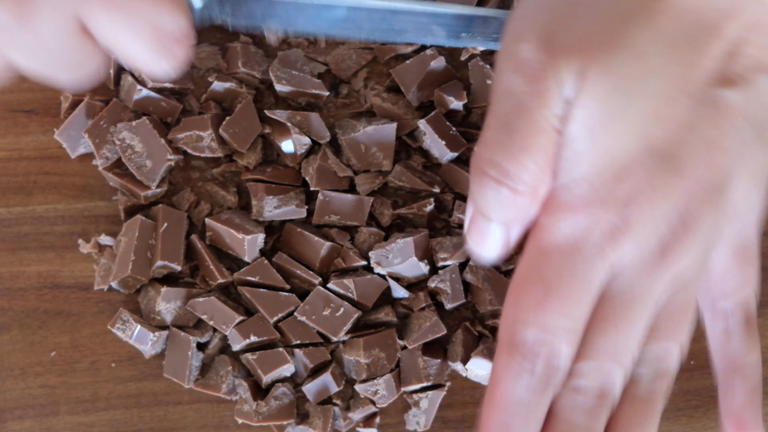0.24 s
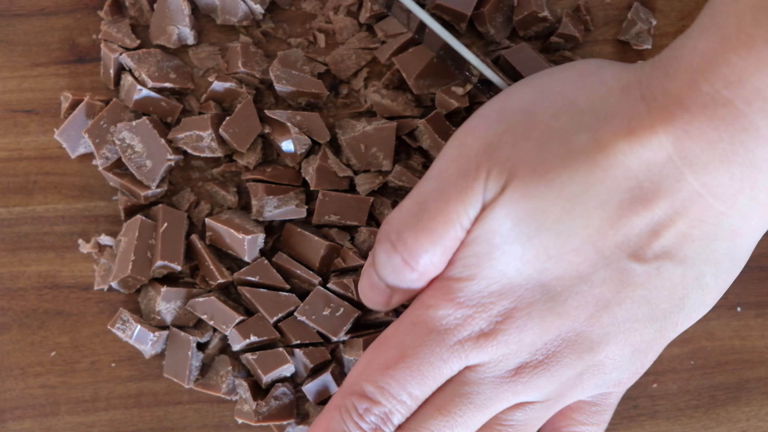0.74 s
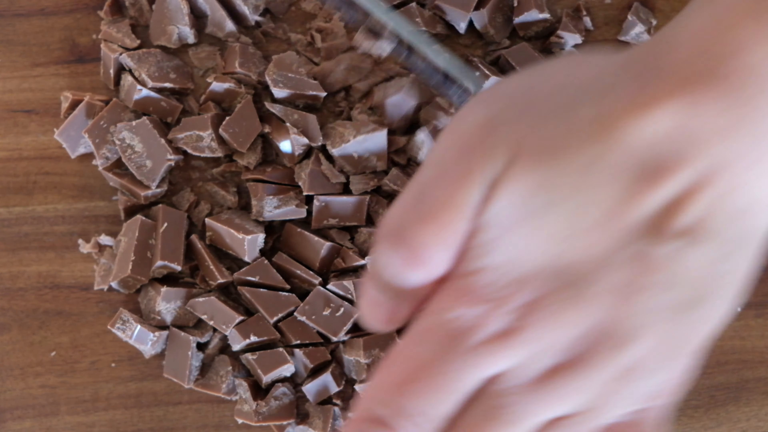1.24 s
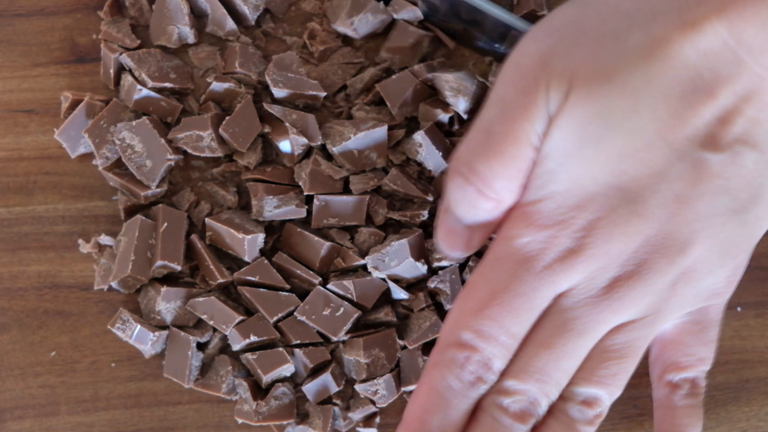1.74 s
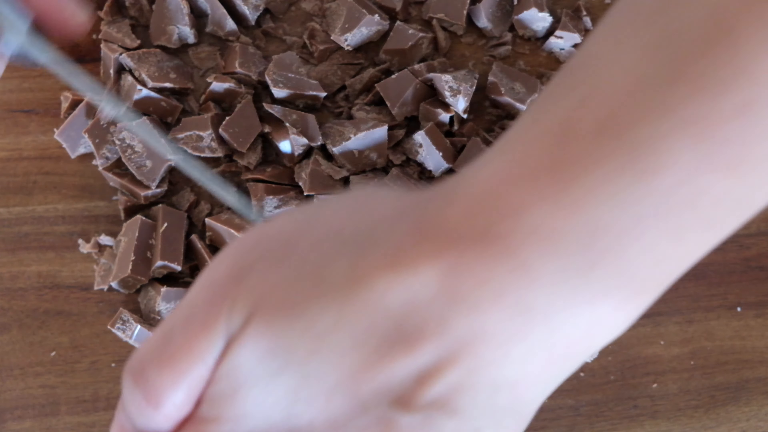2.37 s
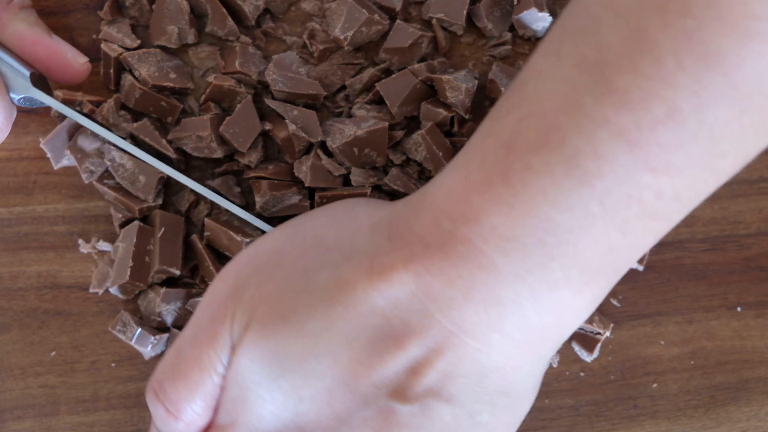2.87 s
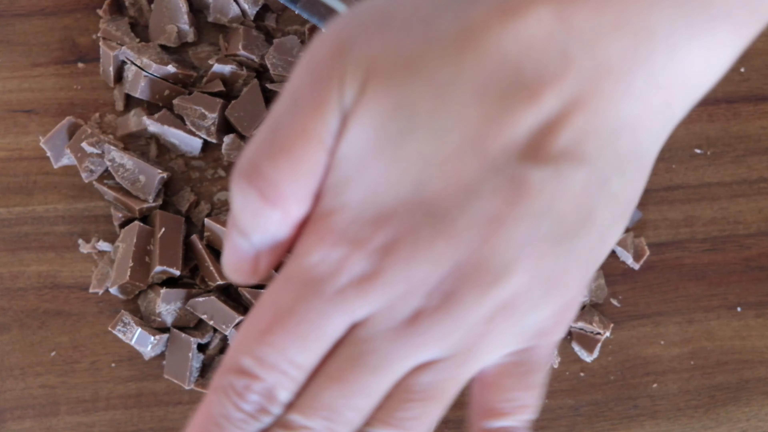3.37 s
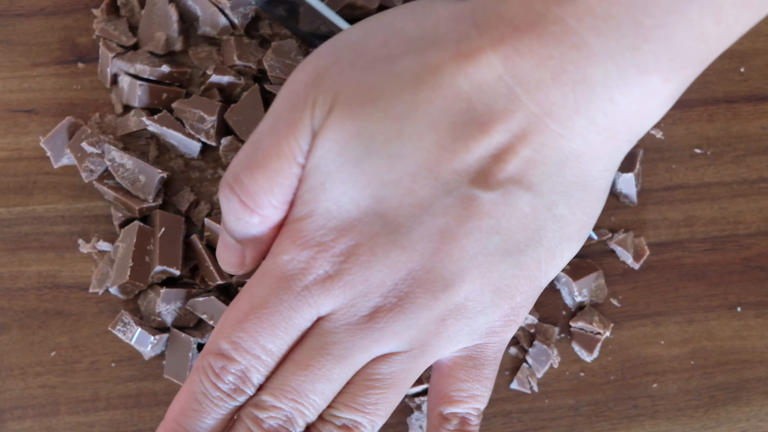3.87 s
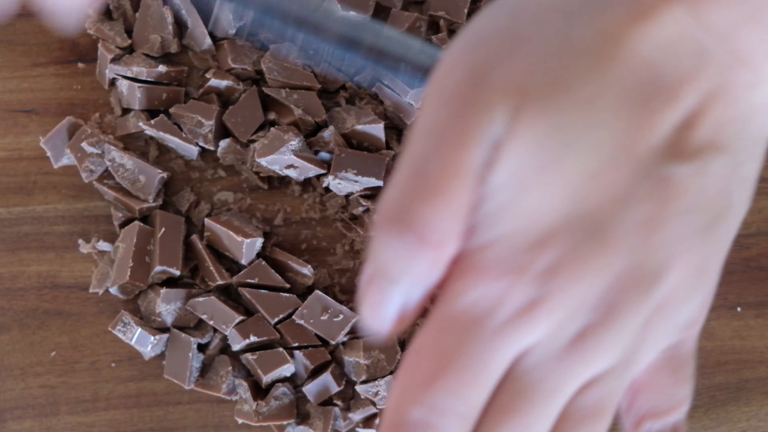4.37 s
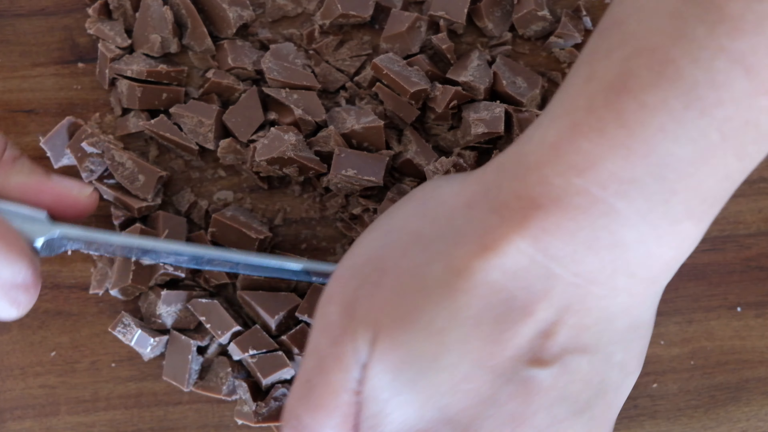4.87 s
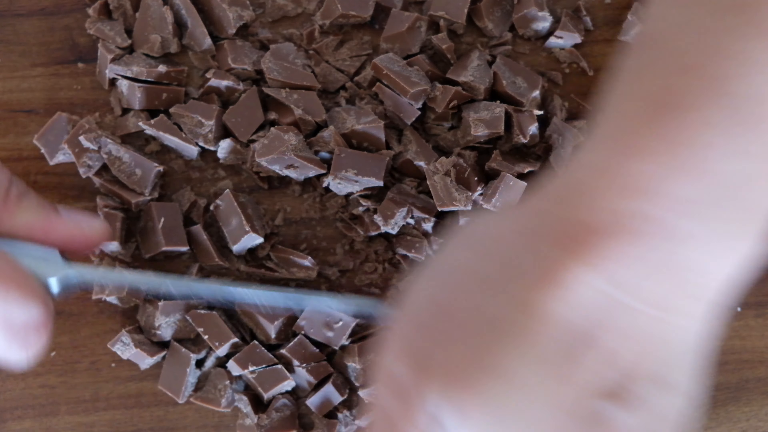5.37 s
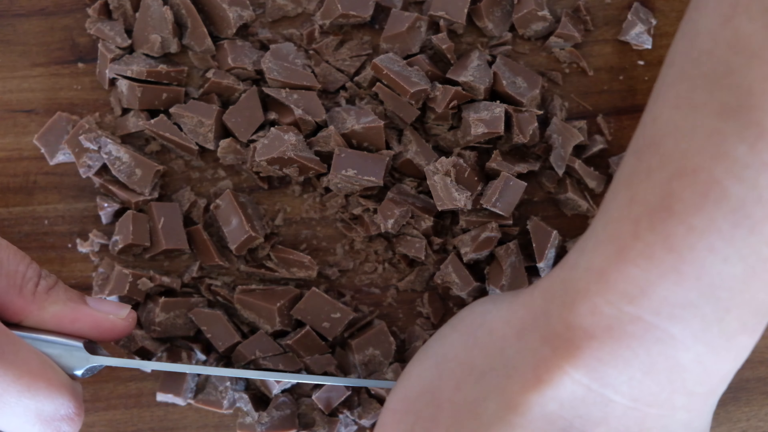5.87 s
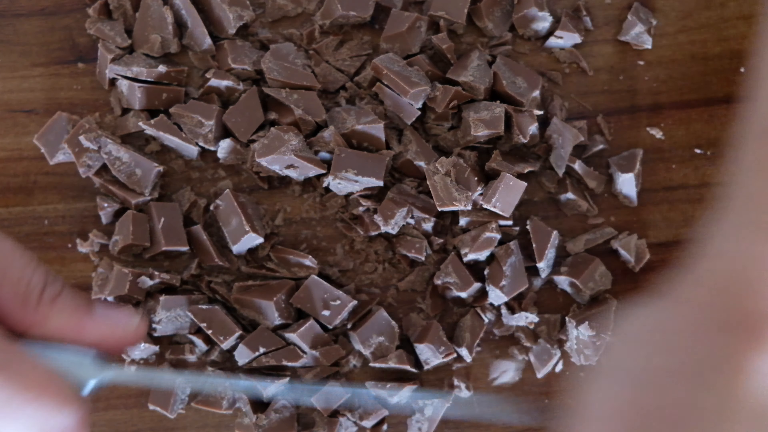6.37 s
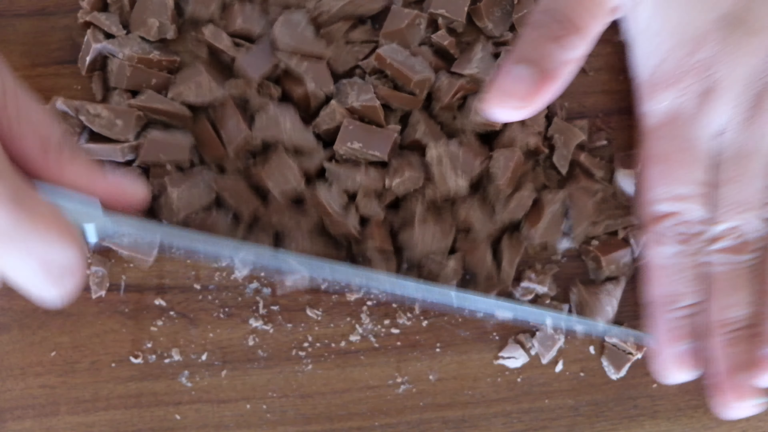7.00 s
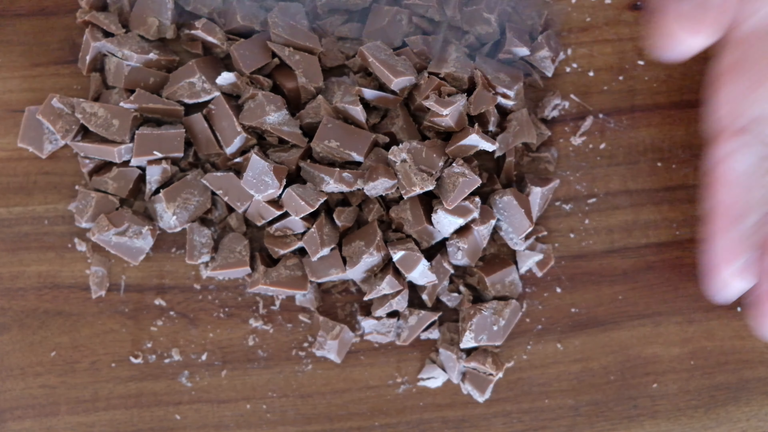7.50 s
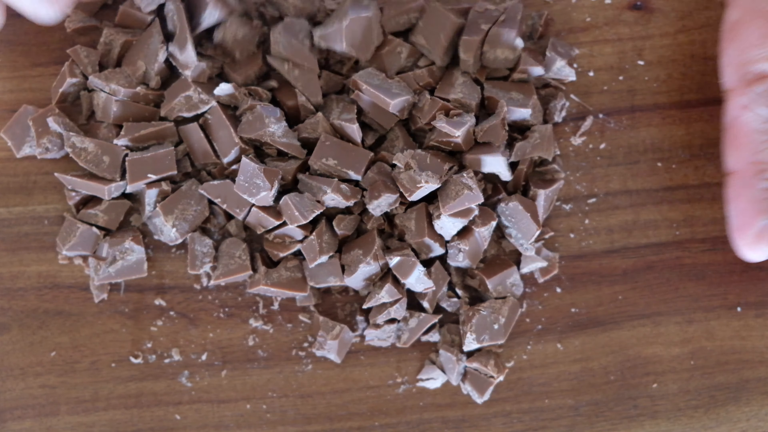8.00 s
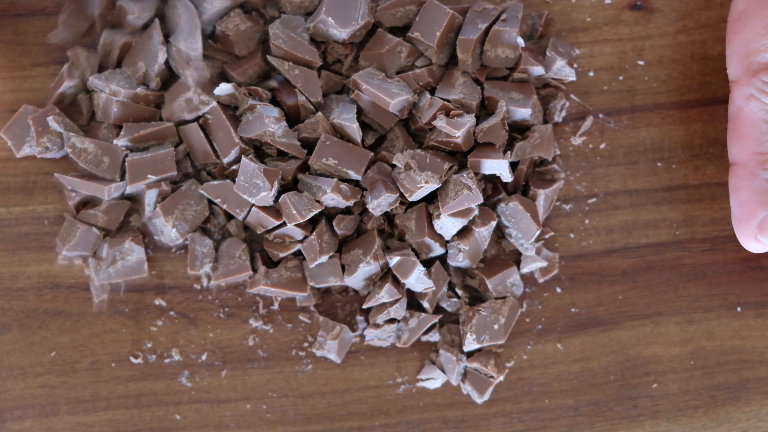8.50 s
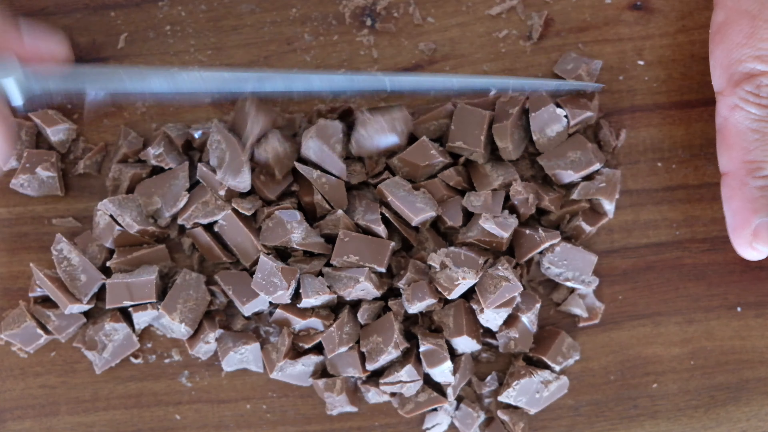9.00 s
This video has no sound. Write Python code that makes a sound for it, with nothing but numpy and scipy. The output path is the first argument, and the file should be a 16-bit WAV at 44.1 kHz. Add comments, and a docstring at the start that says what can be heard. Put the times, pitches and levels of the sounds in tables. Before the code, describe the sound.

Hard wooden chopping knocks through chocolate in an echoing kitchen, small dry taps between them, ending with a metallic scrape and tumbling pieces.

```python
"""Chopping chocolate on a wooden board

A knife chops chocolate in a hard-walled kitchen, then scrapes the chunks together. Each chop is a short damped
ring that strikes ringing modes of board and table and pushes noise-like reverberation into the room.
Friction grains and jumps of the edge drive steel modes, so the blade sings and chatters; filtered grains make the
pile and crumbs. A fridge-like hum lies below; a limiter squashes the knocks and the room swells behind them."""
import sys
import numpy as np
from scipy import signal
from scipy.fft import rfft, irfft
from scipy.io import wavfile
from scipy.ndimage import uniform_filter1d

SR = 44100
rng = np.random.default_rng(int(sys.argv[2]) if len(sys.argv) > 2 else 0)


def transcribe(signal):
    """Save signal, clipped to [-1, 1], as a 16-bit WAV file at the path in sys.argv[1]."""
    frames = np.atleast_2d(signal).T
    limited = np.clip(frames, -1, 1)
    pcm = np.round(limited * 32767).astype(np.int16)
    wavfile.write(sys.argv[1], SR, pcm)


def makeup_ratio(level_db):
    """Linear amplitude ratio for a level in decibels (20 dB per factor of ten)."""
    decades = np.asarray(level_db, float) / 20
    return 10 ** decades


N = 407925
LEAD = SR // 4   # samples run in before the start
STOP_S = 0.0046   # time in which a swell is cut off at its end
MID_BLADE_HZ = 250   # bottom of the push into the room for a blow at mid blade

# Blade meets board. Each row: time in seconds, knock level in dB, relative push to the room in dB,
# relative table thump in dB, bottom of the push in Hz.
CHOP_BLOWS = [(-.1, 0, -6, -39.5, 430), (0.9525, 4.5, -16, -44, 384), (1.7153, 10.5, -10, -42.5, 402),
              (2.869, 8.5, -11.5, -29.5, 152), (3.7, -11.5, -38.5, -65.5, 514),
              (3.9689, 4, -18.5, -38, 210), (5.0598, 13.5, -3.5, -28, 256), (6.035, 9.5, -8, -30, 190),
              (6.7427, 1, -23, -52, 300), (8.372, -0.5, -25, -66, 500)]
# Chunks snap or drop, the blade touches down. Each row: time in seconds, level in dB, pitch in Hz,
# crack in dB relative to the ring, relative table thump in dB.
SMALL_TAPS = [(0.448, -51, 2570, 5, -72), (0.478, -54, 1430, 10, -69), (0.5875, -36, 1500, -9, -56),
              (1.178, -27, 1460, -2, -67), (1.233, -43, 2210, 2, -69), (1.289, -29.5, 1440, -23, -58),
              (1.34, -27.5, 1860, -8, -65), (1.3509, -28, 1620, 3.5, -60),
              (2.5163, -31.5, 1370, -32.5, -51.5), (3.255, -33.5, 1600, -13, -53.5),
              (3.5468, -36, 1570, -4, -58), (3.952, -22, 1500, -25, -57), (4.2153, -31, 1410, -17, -58),
              (4.287, -39, 1900, -15, -69), (4.336, -32, 1410, -24, -66), (4.357, -38, 1700, -12, -69),
              (4.7282, -32, 1550, -17, -49.5), (4.7666, -26.5, 1540, -31, -53.5),
              (4.8372, -33.5, 1750, -18, -65), (7.1223, -27, 1460, -23, -78), (7.3075, -26, 1410, -30, -66),
              (8.278, -43, 1470, -15, -75), (9.0087, -33, 1400, -14, -74)]
# Spectrum of crackling crumbs. Each row: frequency in Hz, relative level in dB per Hz.
CRUMB_COLOUR = [(590, -31), (1000, -3), (1840, -2), (2470, -6), (3180, -7), (10400, -27.5), (15500, -38.5)]


def rms_one(x):
    """Scale to unit rms."""
    return x / np.sqrt(np.mean(x ** 2) + 1e-20)


def at_hz(points, hz):
    """Read a spectrum table on a log frequency axis."""
    table_hz, values = np.array(points).T
    return np.interp(np.log(hz + 1), np.log(table_hz), values)


def clicks(times, sizes):
    """A train of single-sample impulses."""
    out = np.full(LEAD + N, 1e-18)
    np.add.at(out, LEAD + np.round(np.array(times) * SR).astype(int), sizes)
    return out


def ring(x, hz, t60):
    """A decaying mode: a unit click sets a sine of height 1 ringing."""
    r, w = makeup_ratio(-60 / (t60 * SR)), 2 * np.pi * hz / SR
    return signal.lfilter([0, np.sin(w)], [1, -2 * r * np.cos(w), r * r], x)


def resonate(x, hz, width):
    """Band-pass resonance with gain 1 on top."""
    r = np.exp(-np.pi * width / SR)
    poles = [1, -2 * r * np.cos(2 * np.pi * hz / SR), r * r]
    return signal.lfilter([(1 - r * r) / 2, 0, (r * r - 1) / 2], poles, x)


def spread(mid, side, spectrum):
    """Colour two noises and mix them to left and right with the likeness and balance of each frequency."""
    # Each row: frequency in Hz, likeness of left and right (1 is identical).
    likeness = [(60, 0.47), (180, 0.84), (550, 0.81), (1650, 0.58), (4970, 0.22), (15000, 0.039)]
    # Each row: frequency in Hz, how much louder the left is in dB.
    left_louder = [(60, 17), (180, 0.5), (550, 0.5), (1650, 0.0), (4970, 0.0), (15000, 0.0)]
    size = mid.shape[-1]
    hz = np.arange(size // 2 + 1) * SR / size
    alike = np.clip(at_hz(likeness, hz), 0, 1)
    lean = at_hz(left_louder, hz) / 2
    sign = np.array([[1], [-1]])   # left, right
    pair = np.sqrt(1 + alike) * rfft(mid) + np.sqrt(1 - alike) * rfft(side) * sign
    return rms_one(irfft(pair * makeup_ratio(at_hz(spectrum, hz) + lean * sign), size))


def grains(per_s, scatter_db):
    """Random clicks of uneven size and either sign, rms 1."""
    sizes = makeup_ratio(scatter_db * np.minimum(rng.exponential(1, LEAD + N), 3))
    sizes = sizes * rng.choice([-1, 1], LEAD + N)
    return rms_one(sizes * (rng.random(LEAD + N) < per_s / SR))


def swell(start, length, peak_at, swell_db):
    """Gain that rises to 1 at a share of the length, sinks again and stops short."""
    peak, end = start + length * np.clip(peak_at, .02, .98), start + length
    t = (np.arange(LEAD + N) - LEAD) / SR
    gain_db = [-swell_db, 0, -swell_db, -swell_db - 30]
    return makeup_ratio(np.interp(t, [start, peak, end, end + STOP_S], gain_db, -200, -200))


def tap(hz, t60, crack_db, crack_hz):
    """A short wooden ring and a bright noise burst; the contact takes a moment, so the ring's front is rounded."""
    t = np.arange(SR // 25) / SR
    body = np.sin(2 * np.pi * hz * t) + 0.22 * np.sin(2 * np.pi * 1.676 * hz * t)
    body = body * makeup_ratio(-60 * t / t60) * (1 - np.exp(-t / 0.00024))
    body = signal.sosfilt(signal.butter(2, [250, 3500], "band", fs=SR, output="sos"), body)
    snap = rng.standard_normal(len(t)) * makeup_ratio(-60 * t / 0.0013)   # t60 1.3 ms
    burst = signal.lfilter(*signal.butter(1, [0.77 * crack_hz, 1.11 * crack_hz], "band", fs=SR), snap)
    burst = signal.lfilter(*signal.butter(3, 6500, fs=SR), burst)
    return body + makeup_ratio(crack_db) * burst / np.abs(burst).max()


def add(out, s, sound):
    """Lay a sound in at its time."""
    at = LEAD + round(s * SR)
    out[at:at + len(sound)] += sound


def chops():
    """Knocks heard directly, each with a low thud of the board, and the band-limited pushes they give to the room."""
    direct, push = np.zeros((2, LEAD + N))
    thud = ring(np.eye(1, 4000)[0], hz=379, t60=0.03)   # the board's short low answer
    for s, knock_db, room_db, thump_db, bottom_hz in CHOP_BLOWS:
        add(direct, s, makeup_ratio(thump_db + 21.5) * thud)
        crack_db = -33.5 + 0.58 * knock_db   # harder knocks crack more
        add(direct, s, makeup_ratio(knock_db) * tap(1327, 0.0059, crack_db, crack_hz=5600))
        top_hz = 1620 * (bottom_hz / MID_BLADE_HZ) ** 0.085   # a blow near the tip pushes higher
        contact = signal.lfilter(*signal.butter(1, bottom_hz, "high", fs=SR), np.eye(1, 800)[0])
        contact = signal.lfilter(*signal.butter(3, top_hz, fs=SR), contact) + 0.14 * contact
        add(push, s, makeup_ratio(room_db) * contact / np.linalg.norm(contact))
    return direct, push


def table():
    """Every blow strikes each mode of board and table with its own strength; the wood takes a few ms to get going."""
    # Modes of board and table. Each row: frequency in Hz, relative level in dB, t60 in seconds.
    wood_modes = [(42.2, -4.5, 0.82), (73.4, -12.5, 0.15), (100, 6.5, 0.1), (133.2, 1, 0.48),
                  (207.2, 0, 0.51), (245.3, -1.5, 0.28), (270.2, 0, 0.56), (299, 3, 0.53), (385, 7, 0.35),
                  (462, -11.5, 0.42), (505, 1, 0.15), (630, -15, 1), (721, -17.5, 0.75), (828, -11.5, 0.88),
                  (864, -16, 0.17), (890, -26.5, 0.25), (1074, -0.5, 0.65), (1314, -2, 0.59),
                  (1410, -4, 0.61), (1540, -7, 0.27)]
    blows = []   # time in seconds, thump in dB, tilt to the treble in dB per octave
    for s, _, _, thump_db, bottom_hz in CHOP_BLOWS:
        # a blow near the tip tilts the modes to the treble
        blows.append((s, thump_db, 1.5 + 2 * np.log2(bottom_hz / MID_BLADE_HZ)))
    for s, _, _, _, thump_db in SMALL_TAPS:
        blows.append((s, thump_db, -3.0))
    s, thump_db, tilt = np.transpose(blows)
    luck_db = rng.normal(0, 2.5, (len(s), len(wood_modes)))
    out = 0
    for k, (hz, level_db, t60) in enumerate(wood_modes):
        struck = clicks(s, makeup_ratio(thump_db + level_db + tilt * np.log2(hz / 130) + luck_db[:, k]))
        # taking away a short ring softens the onset
        out = out + (-1) ** k * (ring(struck, hz, t60) - ring(struck, hz, 0.021))
    return out


def crunch():
    """Chocolate gives way: gritty crackle swells as the edge presses through, just before each full chop."""
    length_s, level = 0.07, 0
    for s, knock_db, *_ in CHOP_BLOWS:
        if knock_db > 1:   # softer blows only touch the board
            gain = makeup_ratio(-53.5 + 0.086 * knock_db)
            level = level + gain * swell(s - length_s - STOP_S, length_s, 0.94, swell_db=8)
    return level * spread(grains(4400, 3.5), .5 * grains(4000, 3.5), CRUMB_COLOUR)


def jumps():
    """The edge catches on the grain in slowing, uneven runs, strongest midway: time, level, brightness."""
    # Each row: first jump in seconds, last jump in seconds, jumps per second,
    # relative level in mid run in dB, brightness in dB.
    chatter_runs = [(6.881, 6.896, 67, -39, 10.5), (7.8485, 7.918, 88, -6, -3),
                    (8.3707, 8.3715, 90, -6.5, -2), (8.444, 8.49, 87, -13.5, -2),
                    (8.539, 8.557, 100, -16.5, -14), (8.576, 8.594, 88, -10.5, 1),
                    (8.617, 8.663, 106, -9, -3.5), (8.677, 8.721, 113, -16.5, 0)]
    rows = []
    for first, last, per_s, mid_db, bright_db in chatter_runs:
        for along in np.linspace(0, 1, round((last - first) * per_s) + 1):
            late, uneven = rng.standard_normal(2)
            s = first + along ** 1.08 * (last - first) + 0.0007 * late
            level_db = mid_db - 2 * (2 * along - 1) ** 2 + 2.5 * uneven
            rows.append((s, level_db, bright_db))
    return np.transpose(rows)


def blade():
    """Friction grains make the steel sing, jumps of the edge make it clack; both use the same modes."""
    # Modes of the steel. Each row: frequency in Hz, width in Hz, relative level in dB when rubbed,
    # relative level in dB when knocked.
    steel_modes = [(449, 340, -19, -7), (795, 18, -4, -30), (846, 60, -2, 2), (1200, 53, -16.5, -6.5),
                   (1900, 41, -9.5, -6), (2590, 170, -24, -9), (2830, 29, -17.5, -9.5),
                   (3270, 20, -21, -16), (3584, 29, -16.5, -13.5), (4345, 110, -20.5, -12.5),
                   (5000, 18, -36, -36), (5320, 57, -29, -13.5), (5820, 130, -15, -8),
                   (7116, 47, -13.5, -17.5), (8600, 23, -18.5, -19), (9030, 45, -29.5, -24.5),
                   (9410, 49, -27, -50), (10270, 69, -33, -25), (11350, 50, -34, -31.5),
                   (12540, 50, -35.5, -31), (13300, 60, -44.5, -38.5), (13900, 80, -29, -28),
                   (15600, 100, -30, -37.5)]
    # The edge glides on bare wood. Each row: start in seconds, length in seconds, peak as a share of the length,
    # then dB settings for low and for high modes, weighted by mode below.
    glides = [(6.421, 0.042, 0.8, -41, -30), (6.77, 0.13, 0.7, -34, -22), (7.789, 0.055, 0.2, -39, -24),
              (8.375, 0.18, 0.53, 4.5, 1.5), (8.552, 0.12, 0.94, 0.5, -10)]
    rub = grains(5000, 4.1)
    s, jump_db, bright_db = jumps()
    clack_s = s + .001   # each clack sounds 1 ms after its listed time
    rubbed = np.array([rub * swell(*row[:3], swell_db=10.5) for row in glides])
    low_db, high_db = np.array(glides)[:, 3:].T
    luck_db = rng.normal(0, 2.3, (len(s), len(steel_modes)))
    out = 0
    for k, (hz, width, song_db, clack_db) in enumerate(steel_modes):
        share = np.clip(np.log2(hz / 850) / 2.7, 0, 1)   # 0 for the low bending modes, 1 for the high ones
        song = makeup_ratio((1.5 - share) * low_db + share * high_db) @ rubbed
        sung = resonate(song, hz, width) / np.sqrt(width / 50)
        damped_s = 0.021 * (850 / hz) ** 0.15   # t60: the board damps the edge as it lands again
        struck = clicks(clack_s, makeup_ratio(jump_db + clack_db + share * bright_db + luck_db[:, k]))
        jumped = ring(struck, hz, damped_s)
        out = out + resonate((-1) ** k * makeup_ratio(song_db) * sung + makeup_ratio(-5) * jumped, hz, .5 * hz)
    return out


def squeaks():
    """The edge brushes the wood lightly and sets one high mode of the blade whispering."""
    # Each row: start in seconds, length in seconds, level in dB.
    light_brushes = [(6.427, 0.041, -66), (7.793, 0.05, -56.5)]
    level = sum(makeup_ratio(db) * swell(s, length, 0.3, swell_db=7) for s, length, db in light_brushes)
    hz, width = 5820, 90
    white = rng.standard_normal(LEAD + N)
    return level * rms_one(resonate(resonate(white, hz, width), hz, width))


def chunks():
    """The blade pushes the pile: chunks tumble ahead of it while its edge grinds over crumbs."""
    # Each row: start in seconds, length in seconds, peak as a share of the length,
    # chunk rumble in dB, grit in dB.
    pile_pushes = [(6.743, 0.083, 0.08, -32.5, -48.5), (6.823, 0.074, 0.57, -37.5, -43.5),
                   (8.371, 0.21, 0.3, -28, -54), (8.568, 0.16, 1, -22.5, -54.5)]
    # Spectrum of tumbling chunks. Each row: frequency in Hz, relative level in dB per Hz.
    chunk_colour = [(88, -30), (150, -7.5), (205, -4.5), (436, 4), (643, -4.5), (1510, -1.5), (1980, -6.5),
                    (6860, -28), (15500, -54)]
    # Spectrum of the grinding edge. Each row: frequency in Hz, relative level in dB per Hz.
    grit_colour = [(880, -34), (1500, -4), (1990, -29.5), (3340, -6.5), (5450, -14), (6890, -10.5),
                   (15500, -32.5)]
    effort = np.array([swell(*row[:3], swell_db=7) for row in pile_pushes])
    tumble, grind = makeup_ratio(np.array(pile_pushes)[:, 3:].T) @ effort
    rumble = spread(grains(2500, 2.7), 0.28 * grains(2500, 1.8), chunk_colour)
    grit = spread(grains(2600, 3.3), 0.39 * grains(3000, 4.0), grit_colour)
    return tumble * rumble + grind * grit


def ticks():
    """Small dry taps of chunks and blade, each a short ring with a crack."""
    out = np.zeros(LEAD + N)
    for s, level_db, hz, crack_db, _ in SMALL_TAPS:
        add(out, s, makeup_ratio(level_db) * tap(hz, 0.0089, crack_db, crack_hz=3550))
    return out


def rustle():
    """Fine crackle of crumbs under hands and blade, swelling over a steady bed."""
    # Each row: start in seconds, length in seconds, level in dB.
    hand_moves = [(0.49, 0.78, -61), (2.193, 0.24, -63.5), (2.747, 0.43, -59), (4.748, 0.26, -59.5),
                  (5.816, 0.58, -64.5), (6.54, 0.32, -69), (6.944, 0.35, -55.5), (7.84, 0.32, -52.5),
                  (8.5, 0.45, -45.5)]
    level = makeup_ratio(-62) + sum(makeup_ratio(db) * swell(s, length, 0.5, swell_db=11.5) for s, length, db in hand_moves)
    return level * spread(grains(6000, 1.33), grains(6000, 3.0), CRUMB_COLOUR)


def room():
    """Reverberation as two noises that build up fast and die band by band, half an octave each."""
    # Each row: frequency in Hz, t60 in seconds.
    room_t60 = [(60, 0.89), (300, 0.75), (1000, 0.67), (3000, 0.69), (8000, 0.5)]
    t = np.arange(SR) / SR
    white = rng.standard_normal((2, 2, SR))
    edges = 40 * 2 ** np.arange(0, 8.8, .5)
    dying = 0
    for k, (low, high) in enumerate(zip(edges, edges[1:])):
        band = signal.sosfilt(signal.butter(2, [low, high], "band", fs=SR, output="sos"), white[k % 2])
        dying = dying + band * makeup_ratio(-60 * t / at_hz(room_t60, np.sqrt(low * high)))
    return dying * (1 - np.exp(-t / 0.00046))


def reverberate(push, faint):
    """Convolve chops and fainter sounds with one room decay in two colours."""
    # Walls and board favour the low middle. Each row: frequency in Hz, relative level in dB per Hz.
    room_colour = [(35, -39), (60, -20), (210, -12.5), (332, -15), (381, -1.5), (468, -7.5), (536, -4.5),
                   (644, -6.5), (790, -3.5), (993, -6.5), (1600, -9.5), (2770, -7.5), (14000, -58.5)]
    plain_colour = [(60, -2.5), (200, -4.0), (2500, -5.5), (6000, -7.0), (14000, -9.5)]   # Hz, dB per Hz
    mid, side = room()
    coloured = spread(mid, side, room_colour) / np.sqrt(SR)
    plain = spread(mid, side, plain_colour) / np.sqrt(SR)
    wet = signal.fftconvolve(push[None], coloured * makeup_ratio(17), axes=1)
    wet += signal.fftconvolve(faint[None], plain, axes=1)
    return wet[:, :LEAD + N]


def kitchen_floor():
    """Steady coloured noise with a drifting motor tone and a few wavering hum bands of narrow noise."""
    # Wavering hum bands. Each row: frequency in Hz, width of each of two resonances in Hz, rms level in dB.
    hum_bands = [(374.8, 17, -59), (930, 14, -81), (2420, 43, -90.5), (4130, 50, -80)]
    # Spectrum of the room noise. Each row: frequency in Hz, relative level in dB per Hz.
    floor_colour = [(15, -54.5), (25, -23), (86, -9.5), (140, -0.5), (305, -2), (368, 1), (582, -5),
                    (1710, -17.5), (2300, -21), (2490, -19), (2770, -31), (4260, -28.5), (4620, -36),
                    (10400, -42.5), (15500, -46.5)]
    white = rng.standard_normal((4, LEAD + N))
    hum = 0
    for hz, width, level_db in hum_bands:
        hum = hum + makeup_ratio(level_db) * rms_one(resonate(resonate(white[2], hz, width), hz, width))
    wander_hz = 2.0 * rms_one(uniform_filter1d(white[3], size=6000))
    motor = makeup_ratio(-55) * np.sin(2 * np.pi * np.cumsum(97 + wander_hz) / SR)   # around 97 Hz
    return makeup_ratio(-50) * spread(white[0], white[1], floor_colour) + hum + motor


def scene():
    """Near sounds reach both microphones almost alike; the room answers in stereo."""
    direct, push = chops()
    small, steel, tumbling = ticks(), blade() + squeaks(), chunks()
    faint = makeup_ratio(-9) * (steel + tumbling.mean(axis=0)) + makeup_ratio(-12.5) * small
    wet = reverberate(push, faint)
    near = (direct + small + table()) * makeup_ratio([[-.3], [.3]]) + steel * makeup_ratio([[.3], [-.3]])
    # the blade lies a little nearer one microphone: the slope shifts it by a fraction of a sample
    near += 0.66 * np.gradient(steel) * [[-1], [1]]
    return (near + tumbling + wet + rustle() + crunch() + kitchen_floor())[:, LEAD:]


def top_cut(x):
    """Nothing passes above the cut-off."""
    return signal.sosfilt(signal.butter(12, 15780, fs=SR, output="sos"), x)


def record(dry):
    """A limiter looks a moment ahead, ducks for each peak and recovers steadily, so the room swells behind knocks."""
    ceiling_db, release_db_per_s, attack_s = -3, 108, 0.00066
    over_db = np.maximum(20 * np.log10(np.abs(dry).max(axis=0) + 1e-9) - ceiling_db, 0)
    ramp = release_db_per_s * np.arange(N) / SR
    held_db = np.maximum.accumulate(over_db + ramp) - ramp   # falls at the release rate after each peak
    r = np.exp(-1 / (attack_s * SR))
    duck_db = np.roll(signal.lfilter([1 - r], [1, -r], held_db), shift=-8)   # 8 samples ahead
    limited = dry * makeup_ratio(-duck_db)
    return top_cut(np.clip(limited, -1, 1))


dry = scene()
out = record(dry)
transcribe(out)
```